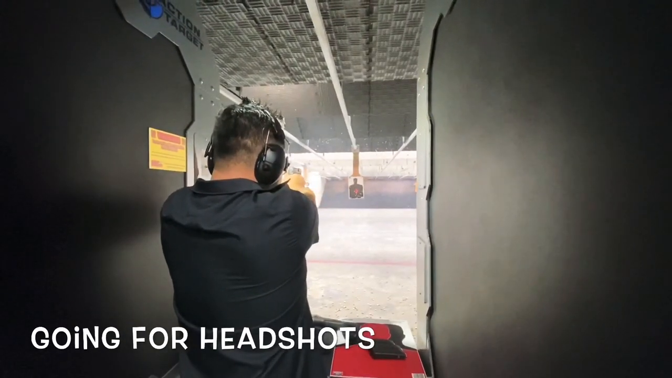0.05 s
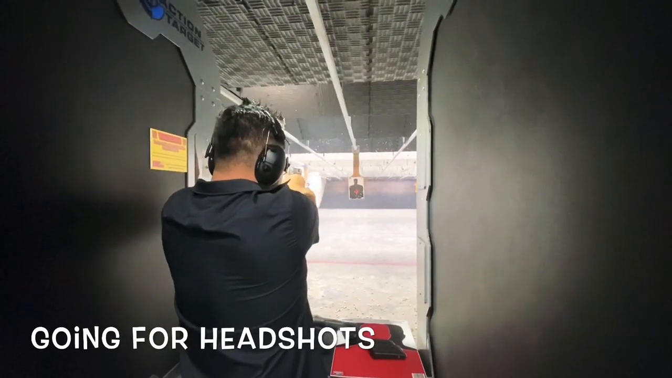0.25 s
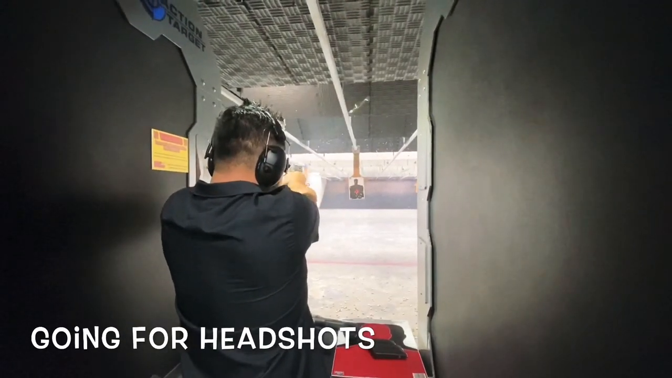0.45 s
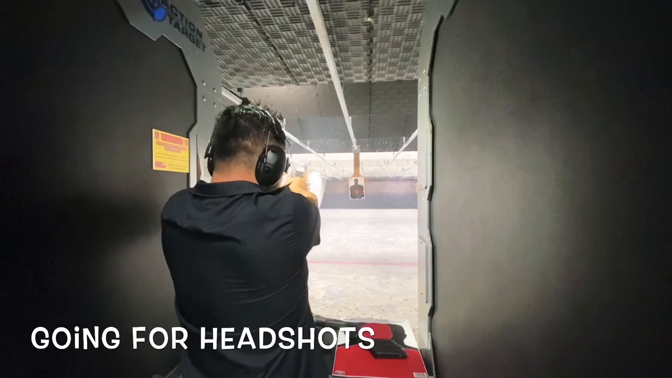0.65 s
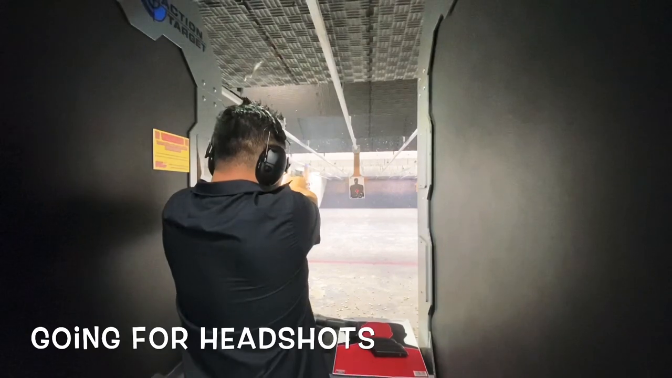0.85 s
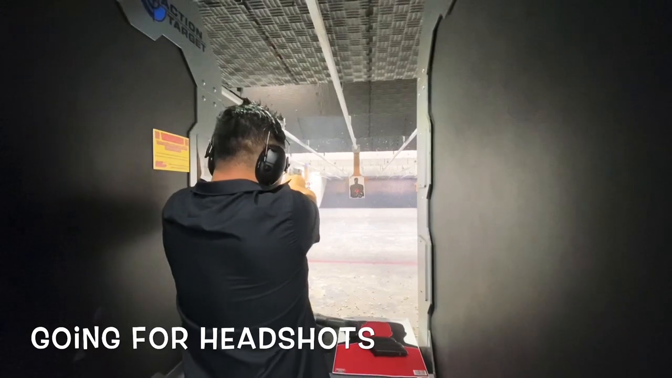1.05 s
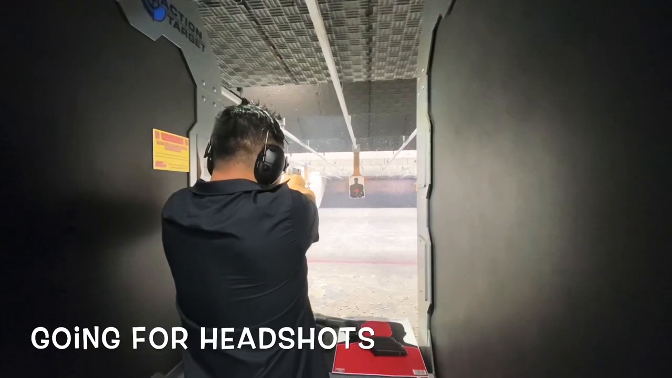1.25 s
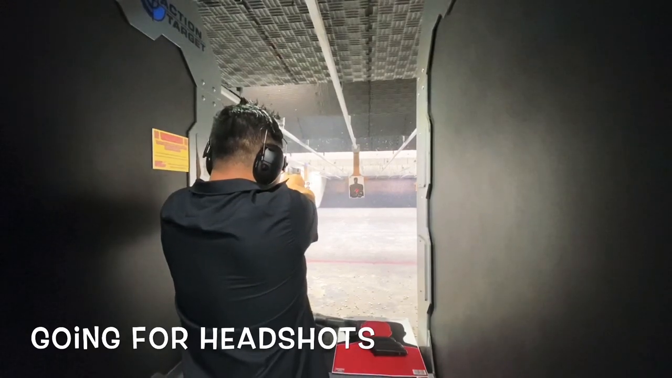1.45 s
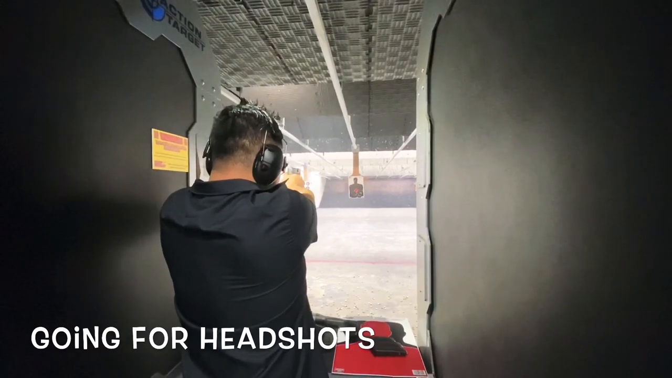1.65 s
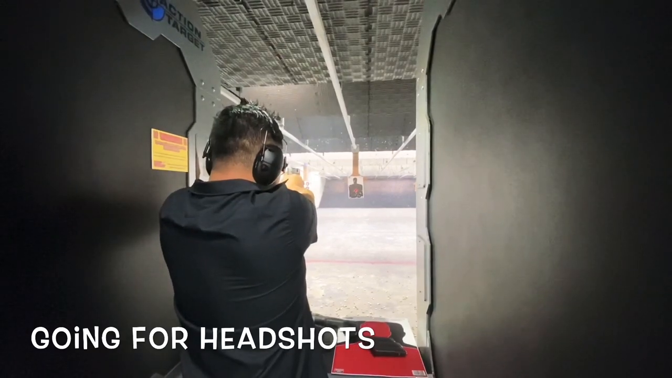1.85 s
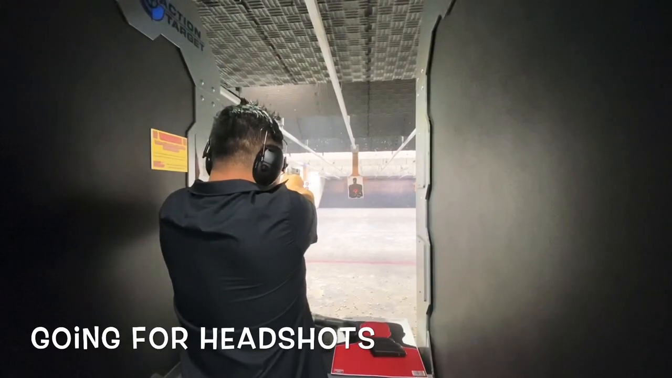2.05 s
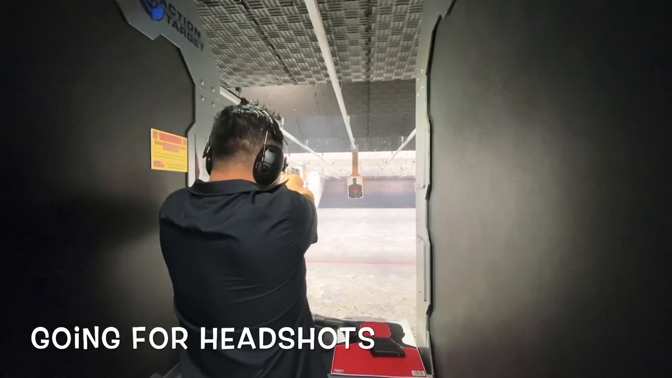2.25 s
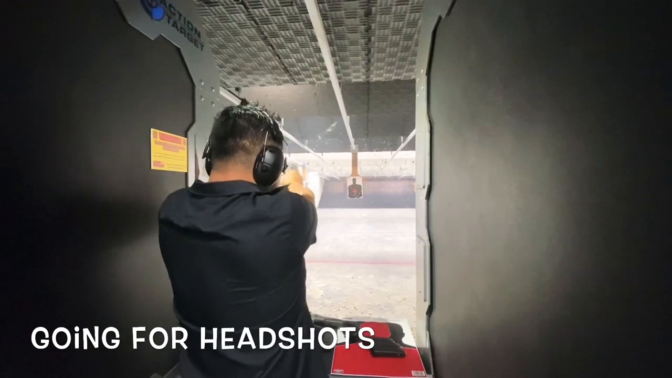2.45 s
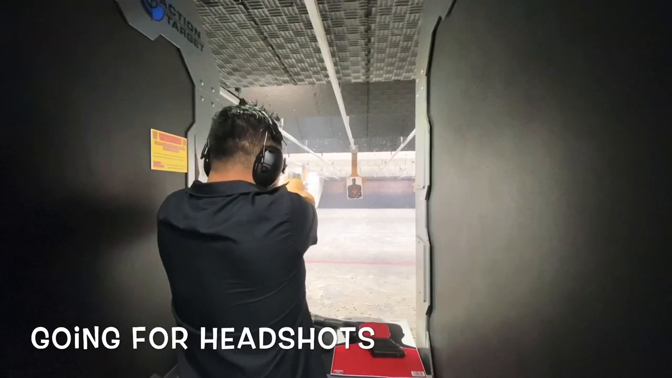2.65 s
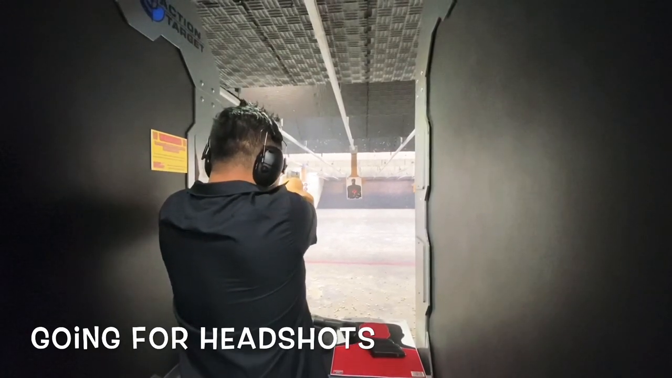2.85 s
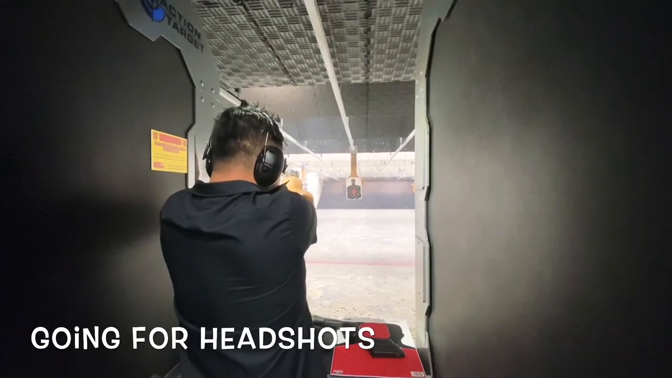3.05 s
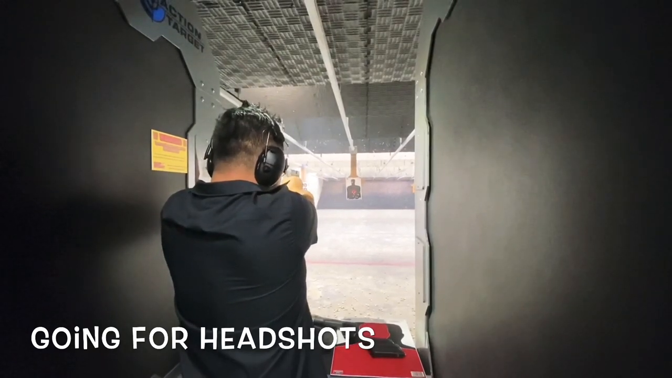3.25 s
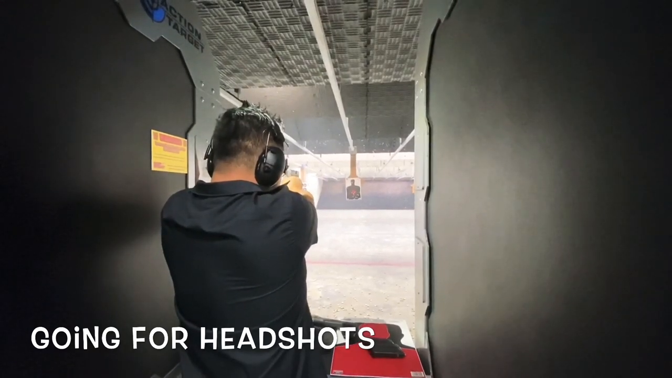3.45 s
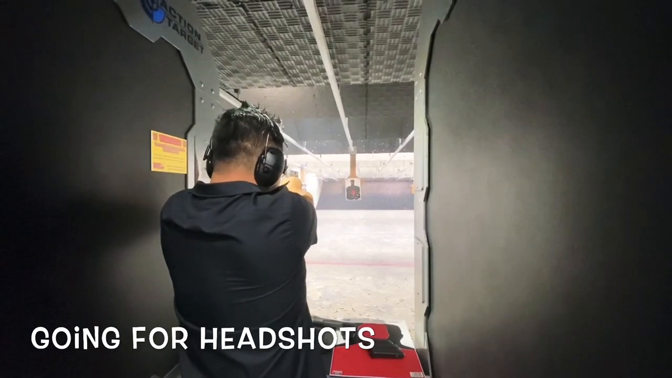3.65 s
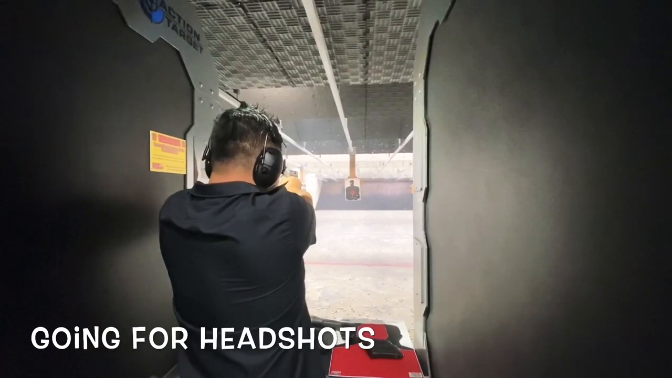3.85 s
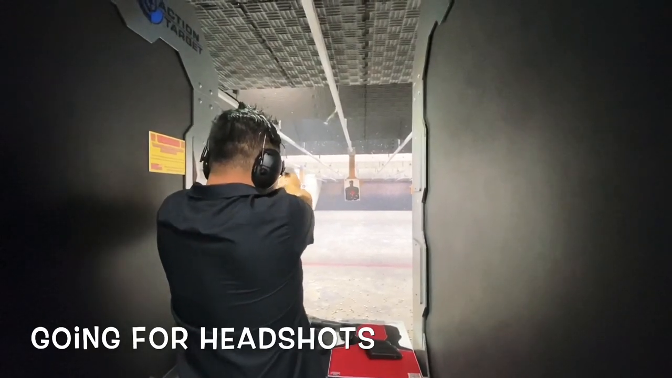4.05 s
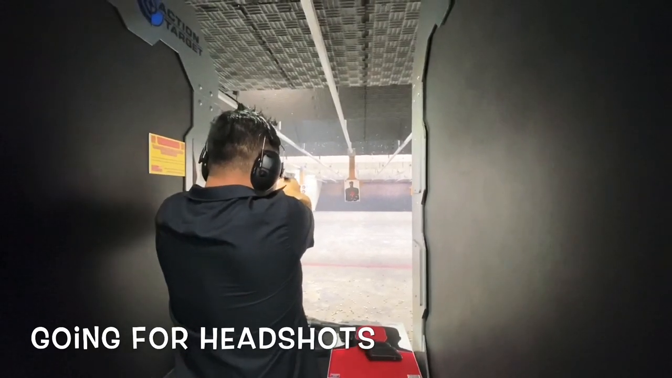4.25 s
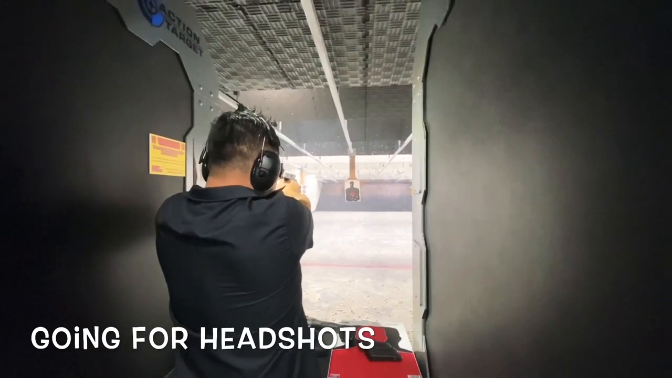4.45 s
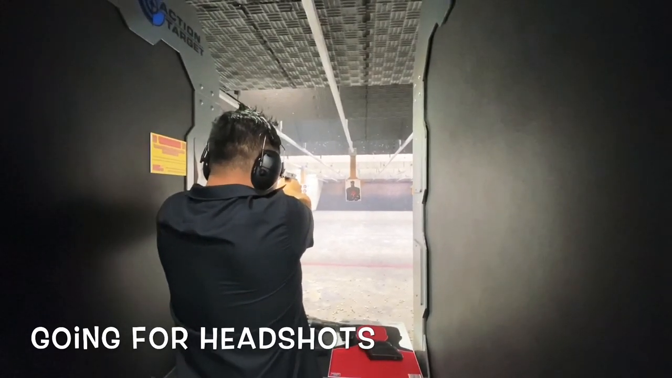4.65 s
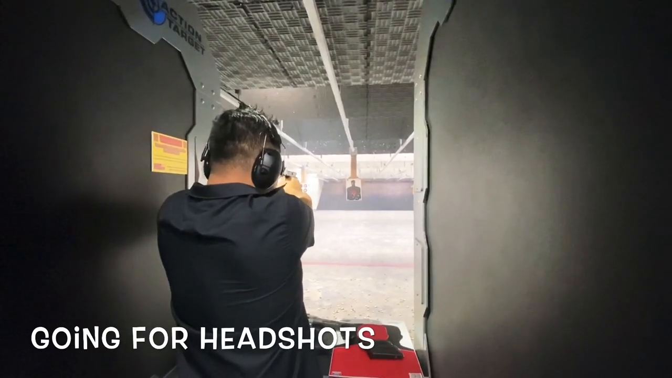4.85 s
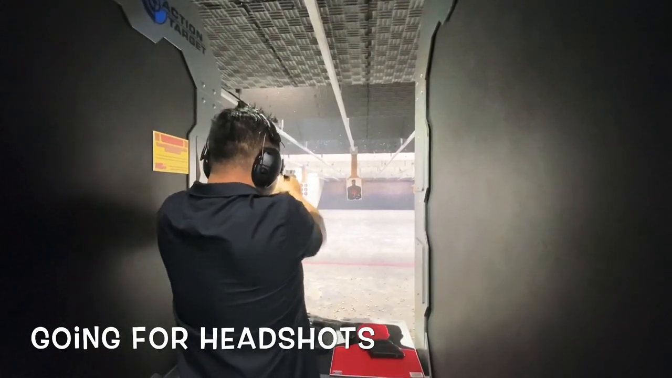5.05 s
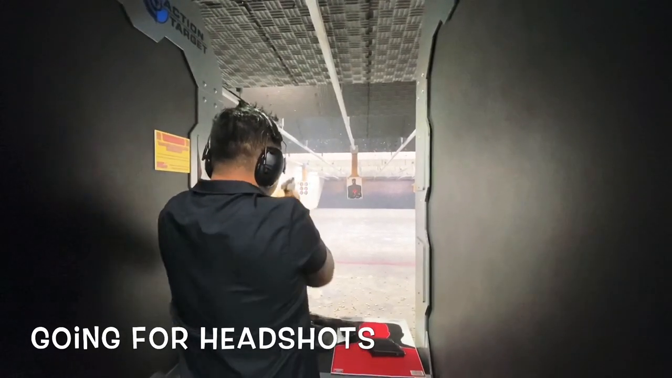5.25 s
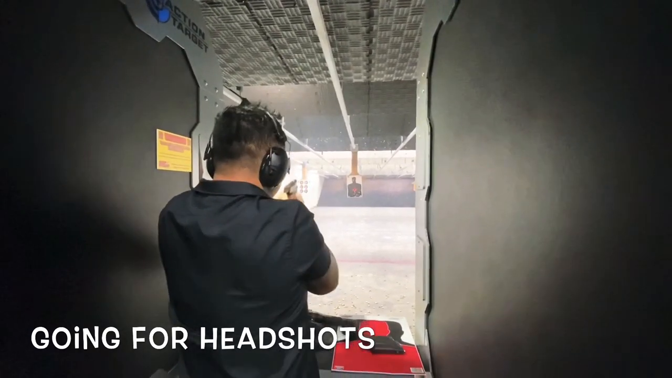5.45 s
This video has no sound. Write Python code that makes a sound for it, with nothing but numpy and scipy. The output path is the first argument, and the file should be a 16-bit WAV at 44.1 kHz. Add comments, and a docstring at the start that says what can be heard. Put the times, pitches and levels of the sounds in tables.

```python
"""Ventilation hums and a spent case tinkles, then two pistols fire five shots in an indoor range.
One pistol is bright and just ahead, the other duller and in the next lane. Each blast is a pressure jump,
noise and ringing tones between booth walls; slower-dying noise and tones roll away down the concrete hall.
Cases and trigger are short noise ticks with a ring; the ventilation is steady noise with wavering tones.
A gain control ducks on loud sound and recovers as the hall dies away, so the echo seems to hang."""
import sys
import numpy as np
from scipy import signal
from scipy.io import wavfile
from scipy.ndimage import uniform_filter1d

SR = 44100
rng = np.random.default_rng(int(sys.argv[2]) if len(sys.argv) > 2 else 0)


def int16_out(signal):
    """Quantize to a 16-bit WAV file."""
    q = np.round(np.clip(np.atleast_2d(signal).T, -1, 1) * 32767)
    wavfile.write(sys.argv[1], SR, q.astype(np.int16))


N = 243431
TIME = np.arange(N) / SR
ECHO = TIME[:3 * SR]   # time line of one long sound
PORT_LAG = 21   # samples by which the right microphone port hears later than the left

# Noise of the blast in each booth, by lane. Each row: pitch in Hz, relative level in dB per Hz.
BLAST = {"own": [(30, -40), (70, -37), (200, -36.5), (350, -33), (700, -36.5), (1150, -34.5), (2000, -40.5),
         (3000, -43), (4200, -49), (6300, -47), (10000, -55), (15000, -62)], "next": [(30, -38.5),
         (70, -35), (250, -37), (600, -38), (1100, -35.5), (2000, -43), (3000, -47), (4500, -50.5),
         (6300, -50), (10000, -58), (15000, -74)]}
# How alike the two ports hear the hall and the ventilation. Each row: pitch in Hz, likeness from 0 to 1.
HALL_LIKENESS = [(80, 0.97), (260, .93), (500, 0.18), (1200, .5), (2200, 0.23), (12000, 0.028)]


def from_db(db):
    """Turn decibels into a gain."""
    return 10 ** (np.asarray(db) / 20)


def at_hz(points, hz):
    """Read a table at a pitch, with straight lines between its rows on a log-frequency axis."""
    table = np.array(points)
    return np.interp(np.log(hz), np.log(table[:, 0]), table[:, 1])


def dying(t, t60):
    """Gain that falls by 60 dB in t60 seconds."""
    return np.exp(-np.log(1000) * t / t60)


def wander(t, per_s):
    """Slow random drift around 0: random points with a spread of 1, joined by straight lines."""
    knots = rng.standard_normal(2000)
    return np.interp(t * per_s, np.arange(len(knots)), knots)


def mode(t, hz, t60):
    """One ringing tone: a dying sine that starts at a random phase."""
    return dying(t, t60) * np.sin(2 * np.pi * (hz * t + rng.random()))


def band_pass(low_hz, high_hz):
    """Filter that keeps the sound between two pitches."""
    return signal.butter(2, [low_hz, high_hz], "band", fs=SR, output="sos")


def panned(db):
    """Left and right gains for a left-minus-right level difference in dB."""
    return from_db([[db / 2], [-db / 2]])


def at_ports(x, pan_db):
    """A sound as it reaches the left port and then, slightly later, the right."""
    later = np.pad(x, (PORT_LAG, 0))[:len(x)]
    return np.array([x, later]) * panned(pan_db)


def add(out, s, sound):
    """Mix a sound in from time s on, cut off at the end of the scene."""
    start = round(s * SR)
    out[:, start:start + sound.shape[-1]] += sound[..., :N - start]


def bands(size, likeness):
    """Third-octave bands of stereo noise at 0 dB per Hz, partly shared by the ports and later at the right."""
    edges = 20 * 2 ** (np.arange(30) / 3)
    run_in = SR // 4   # samples for the filters to settle, then thrown away
    white = rng.standard_normal((2, 2, size + run_in)) * np.sqrt(SR / 2)
    for k, (low, high) in enumerate(zip(edges, edges[1:])):
        # neighbouring bands take turns with two separate noises
        mid, side = signal.sosfilt(band_pass(low, high), white[k % 2])
        hz = np.sqrt(low * high)
        alike = np.clip(at_hz(likeness, hz), 0, 1)
        mid = np.sqrt((1 + alike) / 2) * mid
        side = np.sqrt((1 - alike) / 2) * side
        left = mid + side
        right = np.roll(mid - side, PORT_LAG)
        yield hz, np.array([left, right])[:, run_in:]


def ventilation(waver_db=3.5):
    """Steady rush of air through the ducts, with fan tones whose level and phase waver."""
    # Rush of air. Each row: pitch in Hz, relative level in dB per Hz.
    rush_levels = [(20, -94), (55, -83.5), (110, -88), (210, -99), (300, -91), (430, -90.5), (550, -102.5),
                   (740, -86), (930, -92), (1350, -108), (2200, -111), (3000, -120), (7000, -133),
                   (15000, -143)]
    # Tones of the fan. Each row: pitch in Hz, middle level in dB.
    fan_tones = [(143, -77.5), (297, -73)]
    rush = sum(noise * from_db(at_hz(rush_levels, hz)) for hz, noise in bands(N, HALL_LIKENESS))
    hum = 0
    for hz, db in fan_tones:
        level = from_db(db + waver_db * wander(TIME, per_s=0.7))
        hum = hum + level * np.sin(2 * np.pi * hz * TIME + wander(TIME, per_s=0.97))
    return (rush + hum) * panned(0.5)


def tick(low_hz, high_hz, t60, room_db, room_t60):
    """A small hard contact: a short burst of noise with a fainter, longer trace of booth echo."""
    noise = signal.sosfilt(band_pass(low_hz, high_hz), rng.standard_normal((2, len(ECHO))))
    fade = dying(ECHO, t60) + from_db(room_db) * dying(ECHO, room_t60)
    return noise / noise.std() * fade


def trigger(frame_db=-6.0):
    """The trigger is taken up: a dry click of noise with a brief ring of the pistol's frame."""
    # Trigger clicks. Each row: start in seconds, level in dB.
    clicks = [(2.158, -63), (3.848, -46)]
    # Ring of the frame. Each row: pitch in Hz, relative level in dB, seconds to fall by 60 dB.
    frame_modes = [(1245, -7, 0.032), (2220, -7.5, 0.12), (2950, -4, 0.097), (3450, -14, 0.045),
                   (5179, -13.5, 0.11)]
    out = np.zeros((2, N))
    for s, db in clicks:
        click = tick(low_hz=1600, high_hz=4200, t60=0.0083, room_db=-13.5, room_t60=0.27)
        frame = sum(from_db(mode_db) * mode(ECHO, hz, t60) for hz, mode_db, t60 in frame_modes)
        add(out, s, from_db(db) * (click + from_db(frame_db) * frame))
    return out


def brass_ring(hz, t60=0.4, width_hz=170):
    """A case's one high tone: narrow noise, which warbles as if from tumbling and booth echoes."""
    shape = band_pass(hz - width_hz / 2, hz + width_hz / 2)
    ring = signal.sosfilt(shape, rng.standard_normal((2, len(ECHO))))
    return ring / ring.std() * dying(ECHO, t60)


def spent_cases(hop_mean_s=0.24, rebound_loss_db=17.5):
    """A case ticks on the concrete and rings, hops once, and lands again more softly."""
    # First landings. Each row: start in seconds, tick level in dB, ring level in dB, ring pitch in Hz.
    landings = [(0.105, -84.5, -71.5, 9900), (1.478, -69, -86, 10200), (2.995, -65.5, -78, 10150),
                (3.386, -55, -66, 10170), (3.800, -67, -71, 10220), (3.849, -68.5, -71, 10770),
                (5.092, -62, -81, 10900)]
    out = np.zeros((2, N))
    for s, tick_db, ring_db, hz in landings:
        hop_s = hop_mean_s * rng.uniform(.9, 1.1)
        for delay_s, loss_db in ((0, 0), (hop_s, rebound_loss_db)):
            contact = tick(low_hz=2000, high_hz=7500, t60=0.013, room_db=-13.5, room_t60=0.2)
            ring = brass_ring(hz)
            landing = from_db(tick_db - loss_db) * contact + from_db(ring_db - loss_db) * ring
            add(out, s + delay_s, landing)
    return out


def hall(build_s=0.0088, return_s=0.32, return_width_s=0.043, return_db=0.5, lumpy_db=0.5, patchy_db=2.0):
    """The long, lumpy echo: treble dies first, and the far end throws back a slight, broad swell."""
    # Noise of the hall. Each row: pitch in Hz, relative level in dB per Hz.
    noise_levels = [(25, -77.5), (45, -62), (90, -55.5), (250, -50), (450, -50.5), (700, -44.5),
                    (1030, -48), (1600, -57.5), (2200, -56), (3000, -65), (4500, -67.5), (6200, -65.5),
                    (10000, -71), (14500, -84)]
    # How the hall dies away. Each row: pitch in Hz, seconds to fall by 60 dB.
    fall_times = [(60, 2), (200, 1.57), (800, 1.536), (2000, 1.456), (4000, 1.376), (8000, 0.78),
                  (11000, 0.79), (14000, 0.17)]
    # Left minus right. Each row: pitch in Hz, level difference in dB.
    balance = [(90, 0), (350, -0.5), (700, 3), (1700, 0.1), (6000, 4), (9000, -2)]
    # Low standing waves. Each row: pitch in Hz, relative level in dB, seconds to fall by 60 dB.
    standing_waves = [(96, -34.5, 1.7), (234, -41, 1.7), (400, -31.5, 1.7)]
    far_end_db = return_db * np.exp(-((ECHO - return_s) / return_width_s) ** 2)
    swell_db = far_end_db + lumpy_db * wander(ECHO, per_s=36)
    waves = sum(from_db(db) * mode(ECHO, hz, t60) for hz, db, t60 in standing_waves)
    tail = at_ports(waves, pan_db=-0.5)
    for hz, noise in bands(len(ECHO), HALL_LIKENESS):
        patches = from_db(patchy_db * wander(ECHO, per_s=22))   # each band swells on its own
        gains = from_db(at_hz(noise_levels, hz)) * panned(at_hz(balance, hz))
        tail = tail + noise * patches * dying(ECHO, at_hz(fall_times, hz)) * gains
    return tail * from_db(swell_db) * (1 - np.exp(-ECHO / build_s))


def shock(t, lane):
    """The muzzle's shock front: a jump in pressure that swings into a brief suction."""
    # Strongest front by lane; the neighbour's comes round the partition.
    # Each row: delay in seconds, relative level in dB, length of the push in seconds.
    fronts = {"own": (0.00027, 0, 0.00009), "next": (0.0047, 8.3, .0006)}
    delay_s, db, push_s = fronts[lane]
    age = np.maximum(t - delay_s, 0) / push_s
    return from_db(db) * (t >= delay_s) * (1 - age) * np.exp(-age)


def slaps(t, lane, per_s=500, spread_db=0.12, width_s=0.0018):
    """Strength of the booth sound over time: a few big echoes and many tiny random wall slaps."""
    # Echoes off bench, partitions and ceiling, by lane. Each row: delay in seconds, change in level in dB.
    big_echoes = {"own": [(.0025, 1.5), (.0095, 5.5), (.016, -2.5), (.025, 4.5)], "next": [(.004, 3.5),
                  (.0105, 4.5), (.019, 0.5)]}
    knots = np.cumsum(rng.exponential(1 / per_s, len(t)))
    small = np.interp(t, knots, from_db(spread_db * rng.standard_normal(len(t))))
    small = small / np.sqrt(np.mean(small ** 2))
    big_db = sum(db * np.exp(-((t - delay) / width_s) ** 2) for delay, db in big_echoes[lane])
    return from_db(big_db) * small


def booth(lane, ring_pan_db=10.5, shock_pan_db=8.5):
    """One muzzle blast in its booth: shock front, crowding reflections, and the partitions left ringing."""
    # Ring by lane. Each row: pitch in Hz, relative level in dB, seconds to fall by 60 dB.
    ring_modes = {"own": [(205.8, -9, 0.21), (269.8, -15, 0.33), (374, -16, 0.16), (513, -13, 0.085),
                  (650, -13.5, 0.26), (718, -12, 0.23), (895, -10.5, 0.3), (1222, -6.5, 0.088),
                  (1800, -14.5, 0.073), (1972, -18, 0.28), (2545, -11.5, 0.087)],
                  "next": [(223.4, -10, 0.1), (292.7, -11.5, .15), (500.5, -16.5, 0.093), (542, -10, 0.12),
                  (681, -13, 0.47), (863, -10.5, 0.18), (994, -2, 0.13), (1220, -14.5, 0.11),
                  (1600, -21.5, .1)]}
    # Build-up by lane. Each row: pitch in Hz, build-up time constant in seconds.
    build_times = {"own": [(60, 0.02), (200, 0.019), (500, 0.0012), (1200, 0.0018), (5000, 0.0021)],
                   "next": [(60, 0.01), (200, 0.005), (500, .001), (1200, 0.0027), (5000, 0.0072)]}
    # Seconds that reflections keep crowding in before the noise starts to fall, one number by lane.
    hold_times = {"own": .018, "next": 0.012}
    # Fall by lane. Each row: pitch in Hz, seconds to fall by 60 dB.
    fall_times = {"own": [(60, 0.59), (250, 0.3), (700, 0.25), (2000, .21), (6000, 0.22), (14000, 0.068)],
                  "next": [(60, 0.25), (250, 0.42), (700, 0.27), (2000, 0.26), (6000, 0.17), (14000, 0.34)]}
    # Left minus right. Each row: pitch in Hz, level difference in dB.
    balance = [(60, 2.5), (200, 1), (380, -4), (700, 5.5), (2400, 3), (4400, 9), (8000, 2), (15000, -1)]
    # How alike the two ports hear the blast. Each row: pitch in Hz, likeness from 0 to 1.
    blast_likeness = [(80, 0), (260, 1), (600, 0.4), (1200, 0), (2200, 0.1), (12000, 0.3)]
    t, echoes, ring = TIME[:SR], 0, 0
    for hz, noise in bands(len(t), blast_likeness):
        build = 1 - np.exp(-t / at_hz(build_times[lane], hz))
        fall = dying(np.maximum(t - hold_times[lane], 0), at_hz(fall_times[lane], hz))
        gains = from_db(at_hz(BLAST[lane], hz)) * panned(at_hz(balance, hz))
        echoes = echoes + noise * build * fall * gains
    for hz, db, t60 in ring_modes[lane]:
        build = 1 - np.exp(-t / at_hz(build_times[lane], hz))
        ring = ring + from_db(db) * build * mode(t, hz, t60)
    answer = (echoes + at_ports(ring, ring_pan_db)) * slaps(t, lane)
    return answer + at_ports(shock(t, lane), shock_pan_db)


def pistols():
    """Every shot sounds in its own booth, which answers alike each time, and in the whole hall."""
    # Shots. Each row: start in seconds, change in blast level in dB, change in hall level in dB, lane.
    shots = [(0.307, -3.5, 0, "own"), (0.705, -2, -0.87, "next"), (2.2141, 2.5, 2.5, "next"),
             (2.3377, -4.5, -1.5, "own"), (3.9231, -3, 0, "own")]
    out = np.zeros((2, N))
    blasts = {lane: booth(lane) for lane in BLAST}
    for s, blast_db, hall_db, lane in shots:
        add(out, s, from_db(blast_db) * blasts[lane])
        add(out, s, from_db(hall_db) * hall())
    return out


def scene():
    """Everything heard from just behind the shooter."""
    return ventilation() + trigger() + spent_cases() + pistols()


def gain_control(x, threshold_db=-10.0, release_db_per_s=30.5, slope=1.0, window_s=.016, attack_s=.004):
    """The gain drops quickly on a loud sound and creeps back at a steady rate in dB."""
    power = uniform_filter1d(np.mean(x ** 2, axis=0), int(window_s * SR))
    level_db = 10 * np.log10(np.maximum(power, 1e-12))
    over = slope * np.maximum(level_db - threshold_db, 0)
    # hold the strongest reduction so far, let go at the release rate
    release = release_db_per_s * TIME
    held = np.maximum.accumulate(over + release) - release
    return x * from_db(-uniform_filter1d(held, max(1, int(attack_s * SR))))


def record(dry, low_cut_hz=40, top_cut_hz=15500):
    """Bass roll-off, gain control, soft overload on the peaks, and a steep cut of the top."""
    low_cut = signal.butter(4, low_cut_hz, "high", fs=SR, output="sos")
    picked_up = signal.sosfilt(low_cut, dry)
    loud = np.tanh(gain_control(picked_up))   # bends peaks towards full scale
    top_cut = signal.ellip(10, .2, 80, top_cut_hz, fs=SR, output="sos")
    return signal.sosfilt(top_cut, loud)


dry = scene()
out = record(dry)
int16_out(out)
```